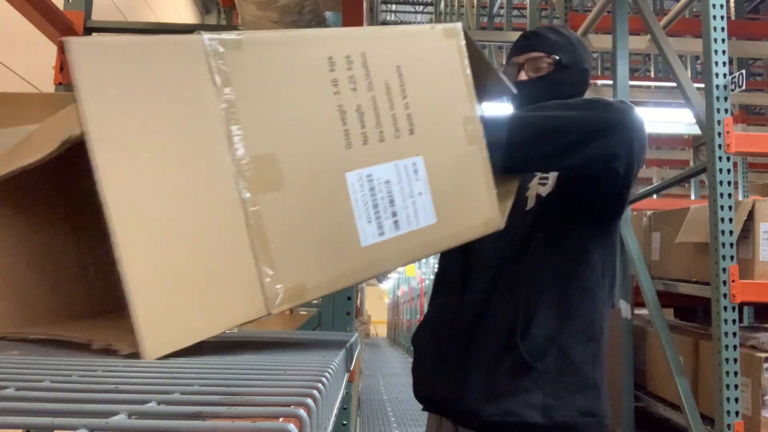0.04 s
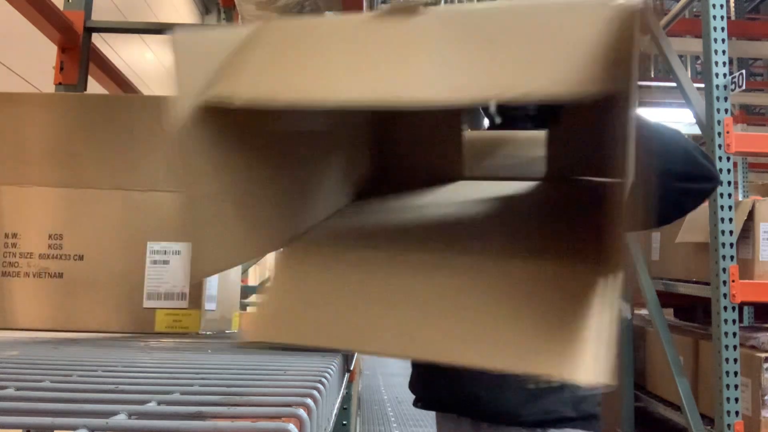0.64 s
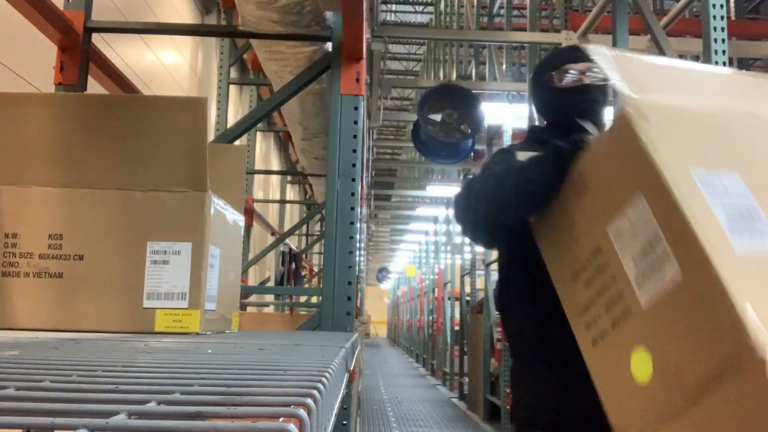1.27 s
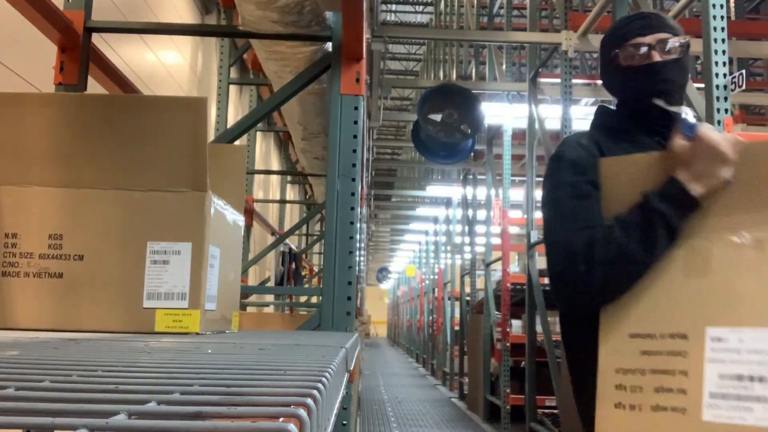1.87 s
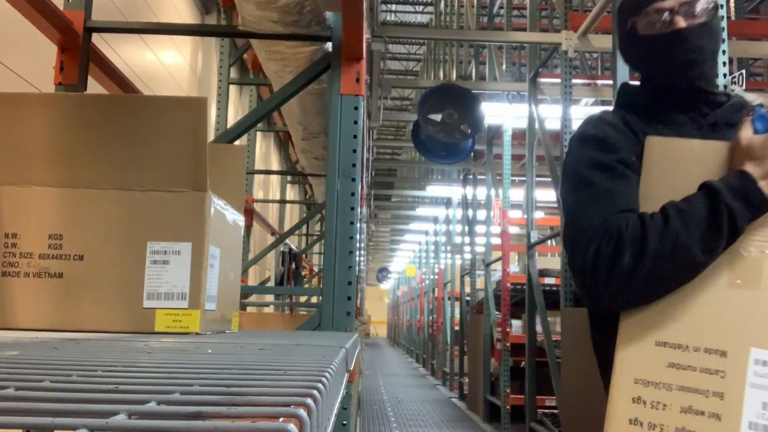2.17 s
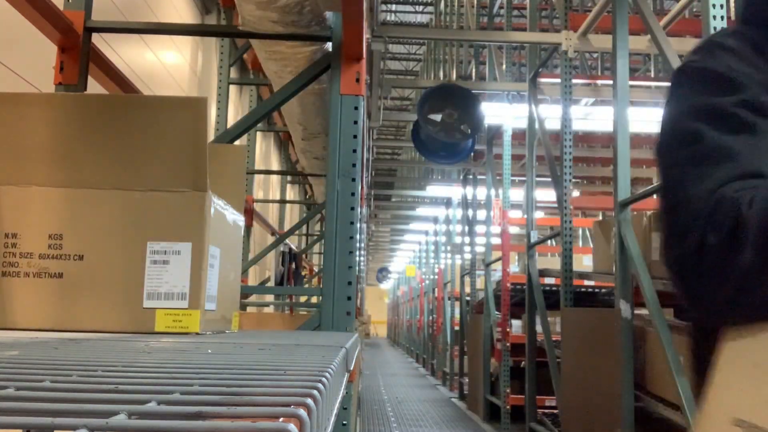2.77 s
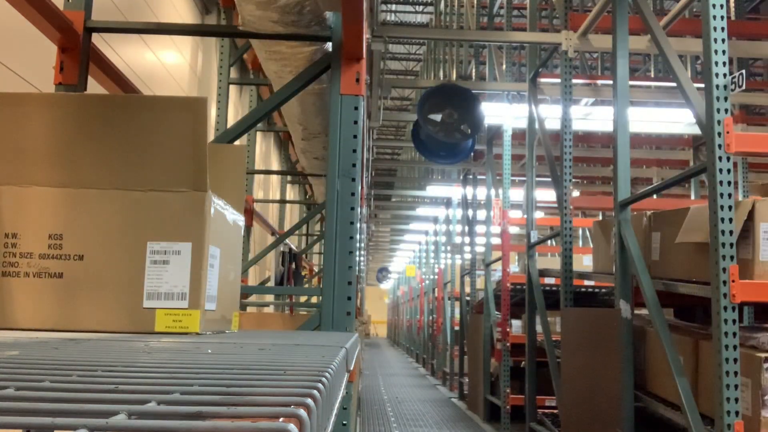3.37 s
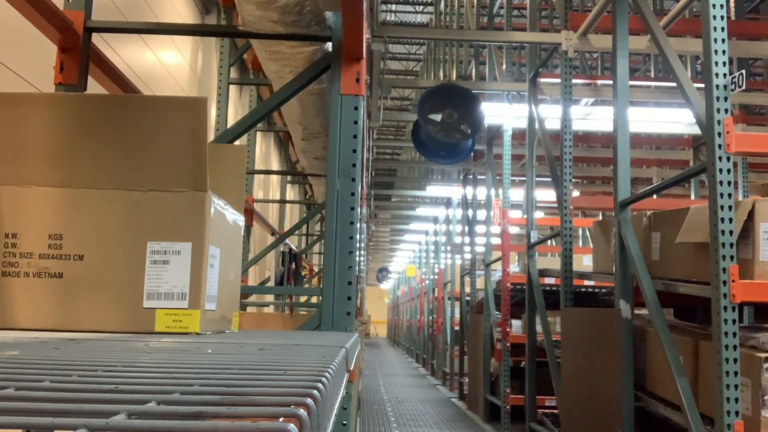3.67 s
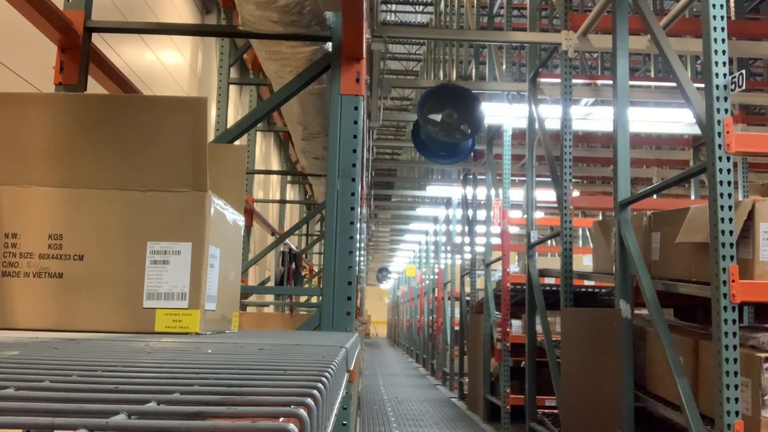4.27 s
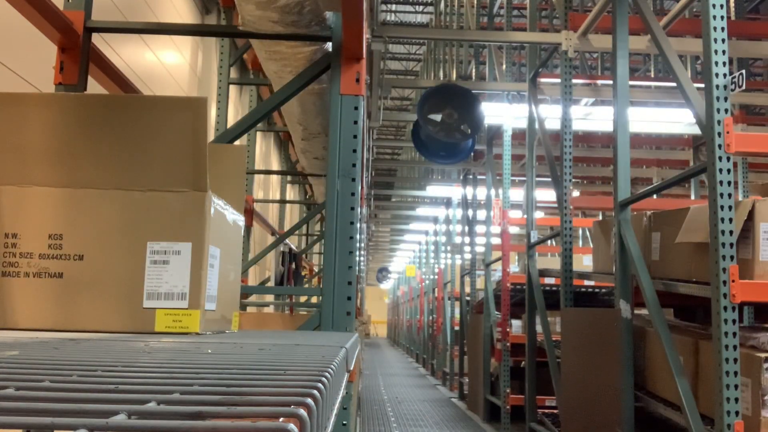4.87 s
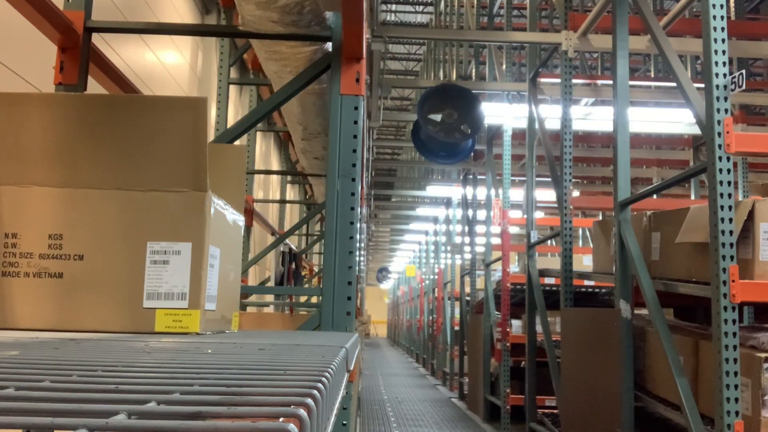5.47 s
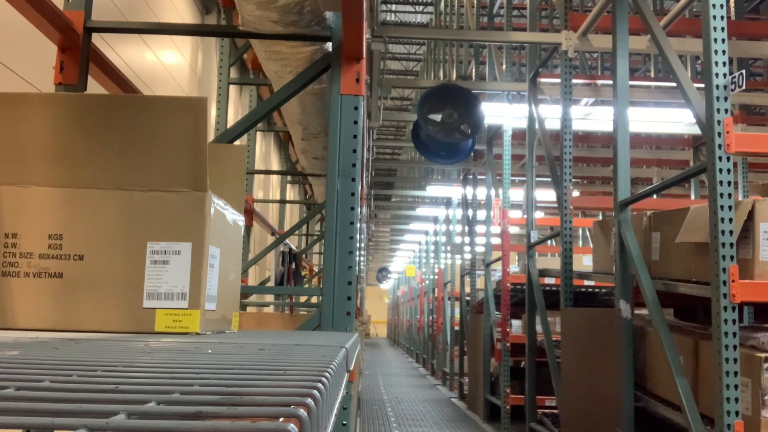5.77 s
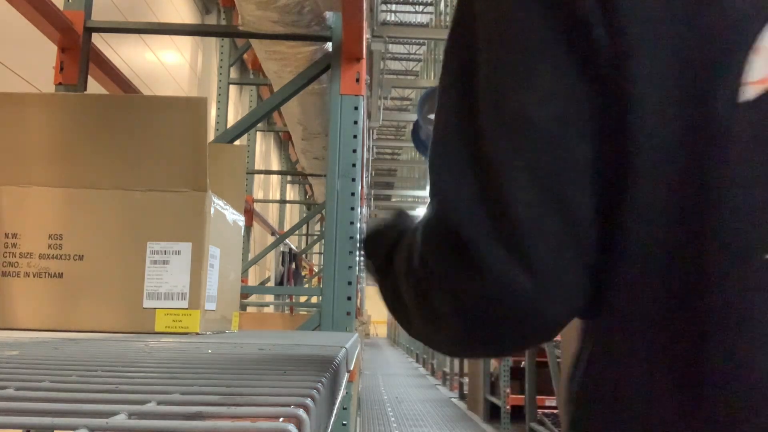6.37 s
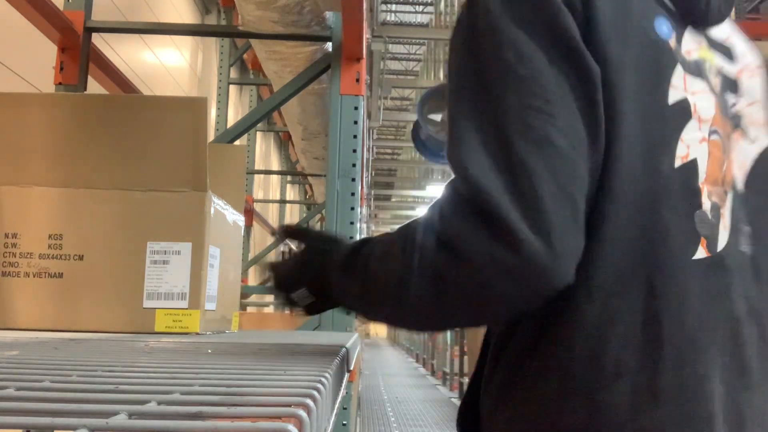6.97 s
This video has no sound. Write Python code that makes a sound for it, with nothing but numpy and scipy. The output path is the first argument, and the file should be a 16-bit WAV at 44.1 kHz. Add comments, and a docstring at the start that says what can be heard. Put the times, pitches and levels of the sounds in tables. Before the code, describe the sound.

An empty cardboard box is dragged off a roller conveyor, folded flat with sharp slaps, and dropped with a boom over a warehouse hum.

```python
"""A large warehouse, ventilation and motors humming far off; a two-port microphone close to an empty box.
First the box is dragged off a roller conveyor: its edge rumbles, cardboard rubs, creases and tape tick.
It is folded flat, the panels sliding and slapping; the hardest slaps overload the microphone.
Soft steps carry it away, and at about 4.5 s it drops on a pile with a boom.
A few more steps and one small slap follow over the hum."""
import sys
import numpy as np
from scipy import signal
from scipy.fft import rfft, irfft, next_fast_len
from scipy.io import wavfile
from scipy.ndimage import uniform_filter1d, map_coordinates

SR = 44100
rng = np.random.default_rng(int(sys.argv[2]) if len(sys.argv) > 2 else 0)


def to_wav(sig):
    """Store sig (one row per channel, or 1-D mono) as 16-bit WAV at the path in sys.argv[1].

    Samples outside -1..1 are clipped; the rate is SR.
    """
    pcm = np.clip(np.atleast_2d(sig), -1, 1) * 32767
    pcm = np.round(pcm).astype(np.int16)
    wavfile.write(sys.argv[1], SR, pcm.T)  # frames by channels


N = 313973
TIME = np.arange(N) / SR

# Levels are in dB; rasps and slaps get a small extra gain, drags a small cut.

# Air in the distant ducts. Each row: frequency in Hz, gain in dB.
AIR_SPECTRUM = [(22, -28), (42, -6), (60, 3.5), (100, 0.5), (165, -2.5), (230, -13), (420, -13),
                (670, -13.5), (900, -19.5), (1900, -21.5), (4000, -30), (6000, -44.5), (8000, -66.5),
                (15000, -63)]
# Air noise common to both ports. Each row: frequency in Hz, dB over what each port hears alone.
AIR_COMMON = [(75, 11.5), (170, -2.5), (1000, 1), (2200, -9.5), (8000, 23.5)]
# Motor tones. Each row: frequency in Hz, rms level in dB.
MOTOR_TONES = [(59.2, -40), (347.7, -41), (1986, -54)]
# The box shuddering, dragged or carried. Each row: time at full speed and hold in seconds, level in dB.
DRAG_STROKES = [(0, 0.018, -15.5), (.19, 0.21, -14), (.45, 0.12, -19.5), (.76, 0.028, -21.5),
                (1.3, 0.14, -21.5), (2.2, 1.4, -31.5), (4.62, 0.13, -17)]
# Modes of the hollow box. Each row: frequency in Hz, width in Hz, gain in dB.
HOLLOW_MODES = [(140, 110, -3.5), (207, 59, -10), (250, 37, 4.5), (375, 38, -4.5), (520, 91, -25),
                (1030, 340, -11)]
# Cardboard on cardboard. Each row: time at full speed and hold in seconds, rasp and hiss levels in dB.
RUB_STROKES = [(0, 0.0061, -30.5, -39.5), (0.153, 0.076, -36.5, -39.5), (0.34, 0.088, -37.5, -44.5),
               (0.696, 0.22, -49, -59.5), (1.227, 0.089, -29.5, -34.5), (1.322, 0.075, -23.5, -27),
               (1.502, 0.072, -24.5, -32.5), (1.653, 0.25, -30.5, -39.5), (1.989, 0.008, -34, -39),
               (2.665, 0.11, -41, -51.5), (3.37, 0.025, -37.5, -50), (3.69, 0.11, -43.5, -56.5),
               (4.449, 0.0058, -24.5, -46), (4.58, 0.044, -32, -46), (4.643, 0.012, -27.5, -42),
               (4.76, 0.2, -37, -61)]
# The rasp of paper faces. Each row: frequency in Hz, gain in dB.
RASP_SPECTRUM = [(150, 0), (500, 6), (1000, 10), (2000, 7.5), (3300, 2.5), (5000, 5.5), (6500, 4),
                 (9000, -9.5), (14000, -74.5)]
# Bright hiss of rubbing cardboard, filtered with a dip near 9 kHz. Each row: frequency in Hz, gain in dB.
HISS_SPECTRUM = [(3000, -48), (6500, 1), (9000, -11), (11000, 17.5), (13000, 4), (15000, -11)]
# Panels slapping together. Each row: time in seconds, ring level in dB, crack level in dB,
# contact decay in seconds, frequency in Hz that the struck spot favours.
PANEL_SLAPS = [(0.082, -22.5, -27.5, 0.0038, 1260), (.428, -13, -21, 0.0039, 1150),
               (.974, -27.5, -35, 0.0044, 1490), (1.215, -19.5, -26.5, 0.0063, 596),
               (1.556, -4, -10.5, 0.0062, 446), (1.621, -15.5, -21.5, 0.0062, 760),
               (1.979, -8, -9, 0.0045, 780), (2.008, -30.5, -16, 0.013, 1100), (2.08, 1.5, 0, 0.0017, 632),
               (2.103, -15, -14.5, 0.0065, 600), (2.699, -21, -23.5, 0.029, 890),
               (2.764, -8, -17, 0.011, 560), (3.082, -15.5, -34, 0.0018, 370),
               (3.260, -22, -36, 0.0062, 500), (3.327, -11, -18, 0.0081, 540),
               (3.414, -24, -25.5, 0.0082, 1410), (3.673, -24.5, -37.5, 0.0059, 1500),
               (3.925, -23.5, -36.5, 0.0086, 490), (4.4, -15, -27.5, 0.016, 620),
               (4.445, -9, -27.5, 0.0069, 338), (4.526, -10.5, -28, 0.005, 317),
               (4.574, -17.5, -35.5, 0.016, 540), (4.645, -24, -22, 0.004, 1130),
               (4.655, -8.5, -20, 0.013, 590), (4.674, -16.5, -25, 0.0098, 625),
               (4.708, -25, -35, 0.017, 654), (4.763, -17, -24, 0.012, 590),
               (7.076, -23.5, -28.5, 0.0089, 1440)]
# Modes of the box walls. Each row: frequency in Hz, width in Hz, gain in dB.
PANEL_MODES = [(301, 110, 0), (366, 35, -3), (485, 65, 7.5), (638, 80, 1.5), (953, 160, 0.5),
               (1180, 330, -6.5), (1770, 400, -11)]
# The crack of panels meeting. Each row: frequency in Hz, gain in dB.
CRACK_SPECTRUM = [(300, -11), (900, -18), (1600, 0), (2500, -1.5), (3400, -4.5), (6000, -8.5),
                  (9000, -21.5), (15000, -25.5)]
# Corrugations crushing. Each row: time at full load and hold in seconds, level in dB.
CRUNCH_STROKES = [(.17, 0.071, -37.5), (1.32, 0.25, -31.5), (4.63, 0.11, -34.5)]
# The whole box bumping and flexing. Each row: start in seconds, level in dB, lowest mode in Hz.
BOX_THUMPS = [(.178, -15, 197.5), (0.372, -20.5, 236), (0.439, -15, 175), (.522, -18, 219), (1.4, -9, 239),
              (1.418, -5.5, 106), (1.447, -15, 220), (1.55, -19.5, 207), (2.08, -17.5, 269),
              (2.7, -17.5, 235), (2.762, -19.5, 284), (3.08, -19.5, 323), (4.445, -6.5, 261.4),
              (4.447, -8, 108), (4.525, -8, 249), (4.579, -11, 154.5), (4.608, -16, 119.5),
              (4.66, 2.5, 124), (4.68, 0, 63.4), (4.699, -7.5, 110), (4.757, -5.5, 88.1),
              (4.818, -13.5, 105.5)]
# Modes of a flexing wall. Each row: multiple of the lowest mode, gain in dB.
FLEX_MODES = [(0.998, -3.5), (1.369, -8.5), (2.1, -9.5)]
# Creases and tape snapping. Each row: start in seconds, level in dB, centre in Hz.
CREASE_TICKS = [(0.218, -19, 4460), (0.238, -22.5, 5670), (0.427, -19, 5470), (.77, -36.5, 5070),
                (.972, -30.5, 5770), (1.3, -17, 12500), (1.55, -9.5, 9300), (1.569, -12.5, 10200),
                (1.815, -25.5, 6030), (1.901, -13.5, 11400), (1.967, -20.5, 12500), (1.977, 2, 3150),
                (2.074, -15, 6340), (2.384, -32.5, 5200), (2.697, -12.5, 4550), (2.757, -20.5, 6000),
                (3.321, -25.5, 11000), (3.376, -26.5, 5240), (3.649, -29, 4970), (3.712, -27, 4530),
                (3.901, -30.5, 4060), (4.373, -23.5, 5930), (4.524, -24.5, 5840), (7.079, -28.5, 8840)]
# Cut edges skidding. Each row: midpoint in seconds, level in dB, centre in Hz, half length in seconds.
EDGE_SKIDS = [(1.28, -25, 6300, 0.044), (1.369, -24, 6760, 0.031), (4.353, -35, 5980, 0.051),
              (4.615, -27, 6630, 0.0067), (5.01, -33.5, 3800, 0.029)]
# Soft steps on the floor. Each row: time in seconds, level in dB.
STEPS = [(2.36, -28.5), (4.03, -28), (5.27, -25.5), (6.21, -32.5), (6.64, -29.5)]
# The warehouse's tail. Each row: frequency in Hz, reverberation time in seconds.
HALL_DECAY = [(125, 1), (500, 0.26), (2000, 0.9), (5000, 0.7), (10000, 0.2)]
# The microphone's right port. Each row: frequency in Hz, gain in dB, phase lag in radians.
RIGHT_RESPONSE = [(30.6, -1.5, -1.6), (64.7, -7, -0.4), (111.5, -19, 0.94), (194, -9.5, 0.87),
                  (367, -1.5, 0.49), (620, 1.5, -0.38), (1090, -4.5, 0.04), (1295, -4.5, 0.22),
                  (2630, -8, -3), (4800, -5.5, -5.5), (8720, 0, -8)]


def undb(db):
    """Decibels to gain."""
    return 10 ** (np.asarray(db) / 20)


def unit(x):
    """Scale to rms 1."""
    return x / np.sqrt(np.mean(x ** 2))


def peaked(x, db):
    """Set the level of the loudest 6 ms."""
    return x * undb(db) / np.sqrt(uniform_filter1d(x ** 2, size=256).max())


def filtered(x, response):
    """Filter by a response given as a function of Hz."""
    n = next_fast_len(x.shape[-1] + 4096)
    hz = np.maximum(np.arange(n // 2 + 1) * SR / n, 1)
    return irfft(rfft(x, n) * response(hz), n)[..., :x.shape[-1]]


def colour(x, points):
    """Filter by a curve through (Hz, dB) points."""
    hz, db = np.transpose(points)
    return filtered(x, lambda f: undb(np.interp(np.log(f), np.log(hz), db)))


def resonate(x, modes):
    """Ring damped modes (Hz, width in Hz, dB)."""
    return filtered(x, lambda f: sum(undb(db) / (1 + 1j * (f * f - hz * hz) / (f * width))
                                     for hz, width, db in modes))


def grains(size, per_s, spread_db):
    """Random tiny clicks of uneven strength."""
    hits = rng.random(size) < per_s / SR
    clicks = hits * rng.standard_normal(size)
    return unit(clicks * undb(spread_db * np.minimum(rng.exponential(size=size), 4)))


def walk(per_s):
    """A random drift with a spread near 1."""
    knots = rng.standard_normal(int(N / SR * per_s) + 2)
    return np.interp(TIME * per_s, np.arange(len(knots)), knots)


def wander(x, depth_s, per_s):
    """Delay by a randomly drifting time, so that pitches waver."""
    return map_coordinates(x, [(TIME + depth_s * walk(per_s)) * SR], order=1, mode="nearest")


def add(track, s, sound):
    """Mix a sound in at s seconds."""
    start = max(int(s * SR), 0)
    track[start:start + len(sound)] += sound[:N - start]


def strokes(rows, attack_s=0.019, release_s=0.024):
    """Envelope of strokes (time, hold, dB) that swell, hold and die away, long ones more gently."""
    power = np.zeros(N)
    for s, hold, db in rows:
        swell = np.maximum(s - TIME, 0) / (attack_s + 0.58 * hold)
        fade = np.maximum(TIME - s - hold, 0) / (release_s + 0.46 * hold)
        power += (undb(db) * np.exp(-swell ** 2 - fade)) ** 2
    return np.sqrt(power)


def machines(air_db=-21, waver_db=2, drift=0.0026):
    """Air rushes in distant ducts, alike at both ports in the bass; motor tones waver on top."""
    common = colour(rng.standard_normal(N), AIR_COMMON)
    own = rng.standard_normal((2, N))
    flatten = [(hz, -10 * np.log10(1 + undb(db) ** 2)) for hz, db in AIR_COMMON]
    white = colour(common + own, flatten)
    air = unit(colour(white, AIR_SPECTRUM)) * undb(air_db)
    motors = np.zeros(N)
    for hz, db in MOTOR_TONES:
        phase = 2 * np.pi * np.cumsum(hz * (1 + drift * walk(5.5))) / SR
        motors += np.sqrt(2) * undb(db + waver_db * walk(11)) * np.sin(phase)
    return air + motors


def dragging(gain_db=-1):
    """The edge sticks and slips, drumming the hollow box, whose pitch shifts as it bends."""
    slips = grains(N, per_s=1400, spread_db=0.4)
    drum = resonate(slips, HOLLOW_MODES)
    drum = colour(drum, [(30, -5.5), (60, 10), (120, 2), (1300, -9), (4000, -12.5), (12000, -20.5)])
    drum = wander(drum, depth_s=0.004, per_s=14)
    return unit(drum) * strokes(DRAG_STROKES) * undb(gain_db)


def sliding(rasp_gain_db=1, catch_db=1.9, snag_db=-7):
    """Paper faces rub: dense slips that catch and let go unevenly, and single fibres that snag."""
    s, hold, rasp_db, hiss_db = np.transpose(RUB_STROKES)
    slips = grains(N, per_s=12000, spread_db=2)
    rasp = unit(colour(slips, RASP_SPECTRUM)) * strokes(zip(s, hold, rasp_db + rasp_gain_db))
    friction = grains(N, per_s=12000, spread_db=3.4)
    snags = undb(snag_db) * grains(N, per_s=260, spread_db=1.4)
    hiss = unit(colour(friction + snags, HISS_SPECTRUM)) * strokes(zip(s, hold, hiss_db))
    return (rasp + hiss) * undb(catch_db * walk(91))


def slaps(ring_gain_db=2, crack_gain_db=1, close_s=0.0044, off_spot_db=-17, push=0.88):
    """Two panels close over a few ms; their push and crushing contact crack and ring the walls."""
    out, lead_s = np.zeros(N), 0.02
    t = np.arange(SR // 4) / SR - lead_s
    for s, ring_db, crack_db, decay_s, hz in PANEL_SLAPS:
        contact = np.exp(np.minimum(t, 0) / close_s - np.maximum(t, 0) / max(decay_s, 0.002))
        # the walls are bent differently at each slap
        modes = [(f * (1 + 0.025 * rng.standard_normal()), width, db) for f, width, db in PANEL_MODES]
        crush = contact * grains(len(t), per_s=9000, spread_db=0.96)
        blow = push * np.linalg.norm(crush) * signal.unit_impulse(len(t), int(lead_s * SR))
        spot = [(hz / 4, off_spot_db), (hz, 0), (hz * 4, off_spot_db), (SR / 2, 2 * off_spot_db)]
        ring = colour(resonate(crush + blow, modes), spot)
        crack = colour(contact * grains(len(t), per_s=13000, spread_db=0.68), CRACK_SPECTRUM)
        slap = peaked(ring, ring_db + ring_gain_db) + peaked(crack, crack_db + crack_gain_db)
        add(out, s - lead_s, slap)
    return out


def crunching(decay_s=0.0005):
    """Ribs of the board give way one after another in a sparse crackle."""
    t = TIME[:SR // 200]
    breaks = grains(N, per_s=320, spread_db=1.3)
    splinter = grains(len(t), per_s=14000, spread_db=1) * np.exp(-t / decay_s)
    crackle = signal.fftconvolve(breaks, splinter)[:N]
    crackle = colour(crackle, [(400, -6), (2000, 13), (6500, -3), (9000, -8.5), (14000, -17)])
    return unit(crackle) * strokes(CRUNCH_STROKES)


def thumps(push_s=0.0029, t60_s=0.092, t60_at_hz=204):
    """A soft blow swings the large walls; their higher modes die sooner."""
    out, t = np.zeros(N), TIME[:SR // 2]
    for s, db, lowest_hz in BOX_THUMPS:
        swing = np.zeros(len(t))
        for multiple, mode_db in FLEX_MODES:
            hz = lowest_hz * multiple * (1 + 0.024 * rng.standard_normal())
            ring_s = t60_s * np.sqrt(t60_at_hz / hz)
            swing += undb(mode_db - 60 * t / ring_s) * np.sin(2 * np.pi * hz * t)
        add(out, s, peaked(swing * (1 - np.exp(-t / push_s)), db))
    return out


def ticks(relative_width=0.47, decay_s=0.0016):
    """A few fibres break at once: a short bright snap."""
    out, t = np.zeros(N), TIME[:SR // 20]
    for s, db, hz in CREASE_TICKS:
        burst = grains(len(t), per_s=14000, spread_db=2) * np.exp(-t / decay_s)
        snap = resonate(burst, [(hz, relative_width * hz, 0)])
        add(out, s, peaked(snap, db))
    return out


def skids(relative_width=0.071):
    """A cut edge zips over the ribs of the board, its slips crowding around one rate."""
    out, lead_s = np.zeros(N), 0.1
    t = np.arange(SR // 5) / SR - lead_s
    for s, db, hz, half_s in EDGE_SKIDS:
        slips = grains(len(t), per_s=6000, spread_db=1.8)
        ribs = resonate(slips, [(hz, relative_width * hz, 0)])
        zipping = unit(resonate(ribs, [(hz, hz / 2, 0)]))
        add(out, s - lead_s, zipping * np.exp(-(t / half_s) ** 2) * undb(db))
    return out


def footfalls(sole_s=0.031, floor_hz=130, width_hz=140):
    """Each step presses a dull thud out of the floor."""
    floor = unit(resonate(rng.standard_normal(N), [(floor_hz, width_hz, 0)]))
    thud = colour(floor, [(350, 5.5), (1500, -22.5)])
    return thud * strokes((s, sole_s, db) for s, db in STEPS)


def racks(near, gain_db=-3, decay_s=0.009):
    """Nearby racks and the conveyor scatter early echoes, in a pattern that changes as the box moves."""
    out, t, hop = np.zeros((2, N)), TIME[:SR // 12], SR // 20
    for start in range(-hop, N, hop):
        first, last = max(start, 0), min(start + 2 * hop, N)
        piece = near[first:last] * np.sin(np.pi * (np.arange(first, last) - start) / (2 * hop))
        for port in out:
            echoes = grains(len(t), per_s=6000, spread_db=0.54) * np.exp(-t / decay_s) * (t > 0.001)
            add(port, first / SR, signal.fftconvolve(piece, echoes / np.linalg.norm(echoes)))
    # long waves pass the thin steel, so little bass comes back
    steel = [(75, -13), (180, 0.5), (900, 3), (2200, 3.5), (6500, 1.5), (9000, -2.5)]
    return undb(gain_db) * colour(out, steel)


def hall(near, gain_db=-12, build_s=0.002):
    """From farther off, the warehouse answers with a long, duller tail."""
    tail, t = np.zeros((2, SR)), TIME[:SR]
    log_hz = np.log([hz for hz, _ in HALL_DECAY])
    for (_, t60_s), share in zip(HALL_DECAY, np.eye(len(HALL_DECAY))):
        noise = rng.standard_normal((2, SR))
        band = filtered(noise, lambda f: np.sqrt(np.interp(np.log(f), log_hz, share)))
        tail += band * undb(-60 * t / t60_s)
    tail = unit(tail * (1 - np.exp(-t / build_s))) * undb(gain_db) / np.sqrt(SR)
    wet = signal.fftconvolve(near[None], tail, axes=1)[:, :N]
    # the echo paths drift, so the tail stays diffuse and holds no tone
    return np.array([wander(port, depth_s=0.0005, per_s=120) for port in wet])


def scene():
    """Box and steps close to the microphone, their echoes around it, the machines far behind."""
    near = slaps() + thumps() + ticks() + sliding() + crunching() + skids() + dragging() + footfalls()
    return near + racks(near) + hall(near) + machines()


def record(dry, top_hz=15700):
    """The microphone: its right port is inverted, five samples late and thin in the bass; both clip."""
    hz, db, lag = np.transpose(RIGHT_RESPONSE)

    def right_port(f):
        """Gain and phase of the right port at f Hz."""
        gain = undb(np.interp(np.log(f), np.log(hz), db))
        return gain * np.exp(-1j * np.interp(np.log(f), np.log(hz), lag))

    right = -filtered(np.roll(dry[1], 5), right_port)
    clipped = np.clip([dry[0], right], -1, 1)
    lowpass = signal.ellip(8, 0.2, 70, top_hz, fs=SR, output="sos")
    return signal.sosfilt(lowpass, clipped)


dry = scene()
out = record(dry)
to_wav(out)
```